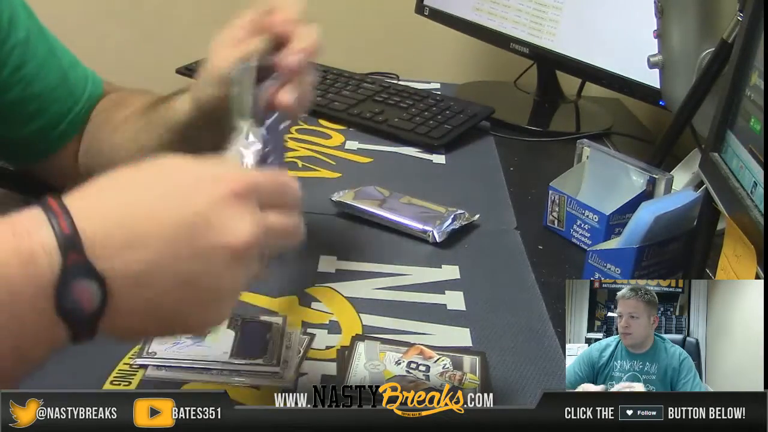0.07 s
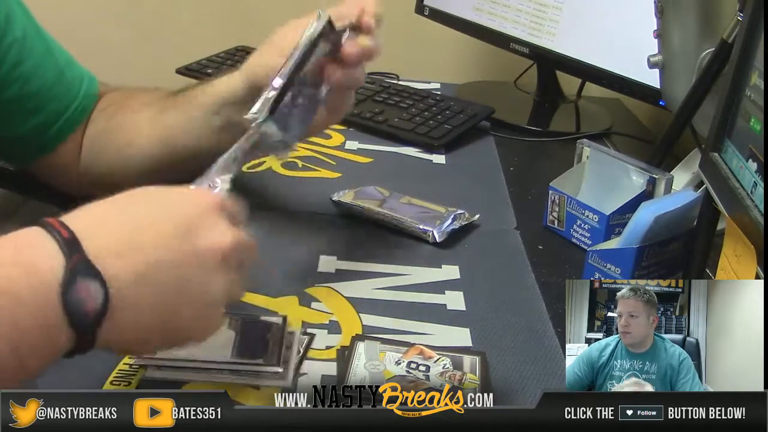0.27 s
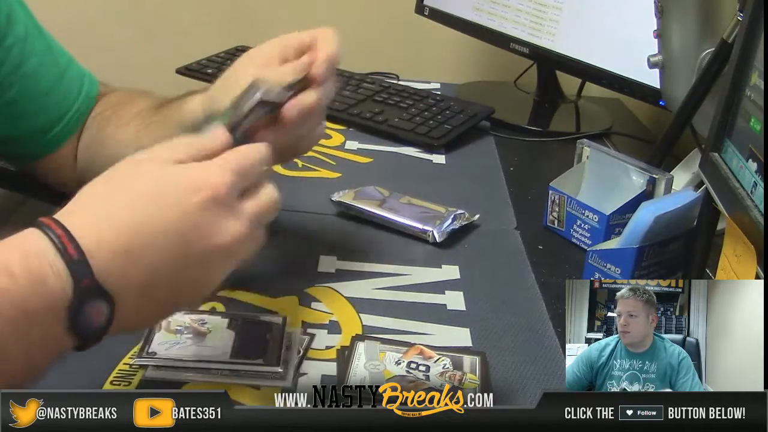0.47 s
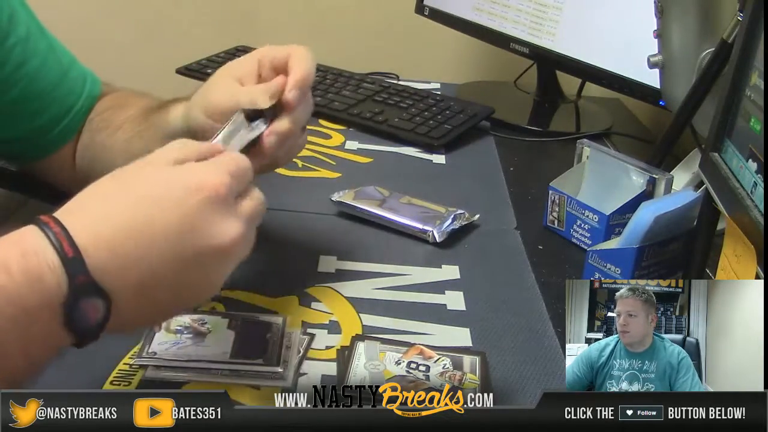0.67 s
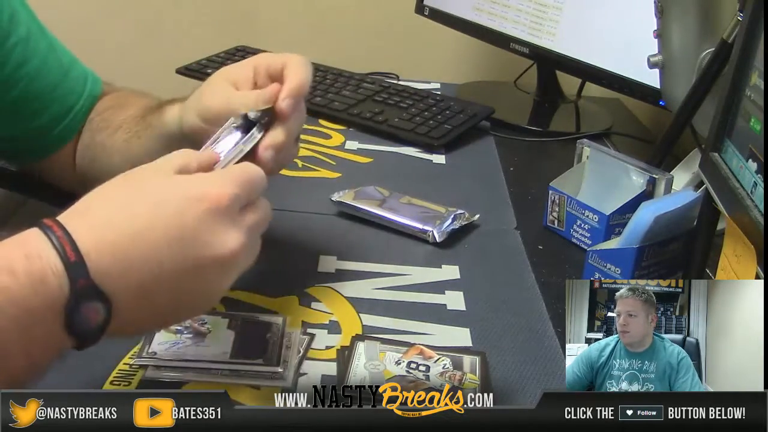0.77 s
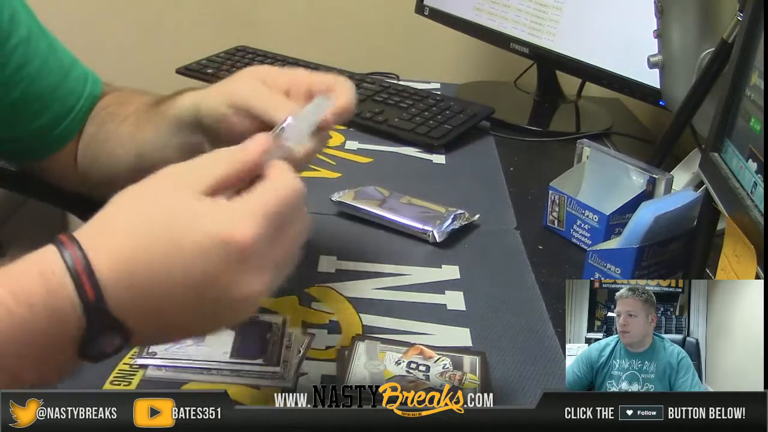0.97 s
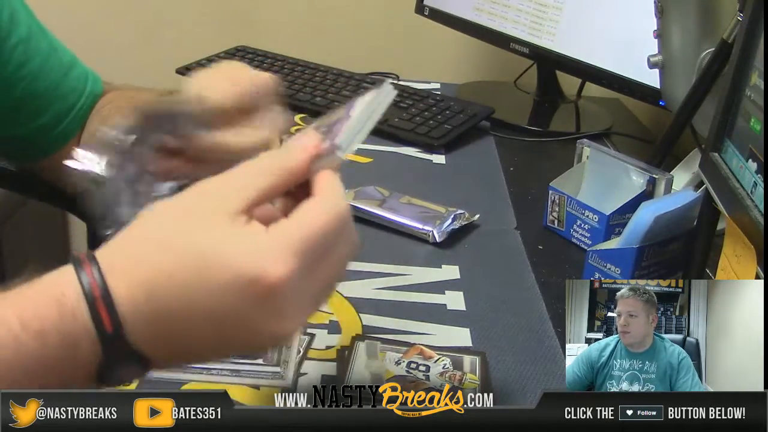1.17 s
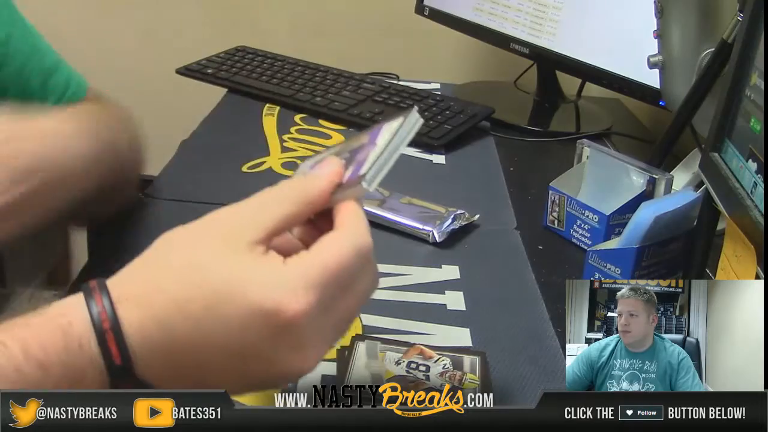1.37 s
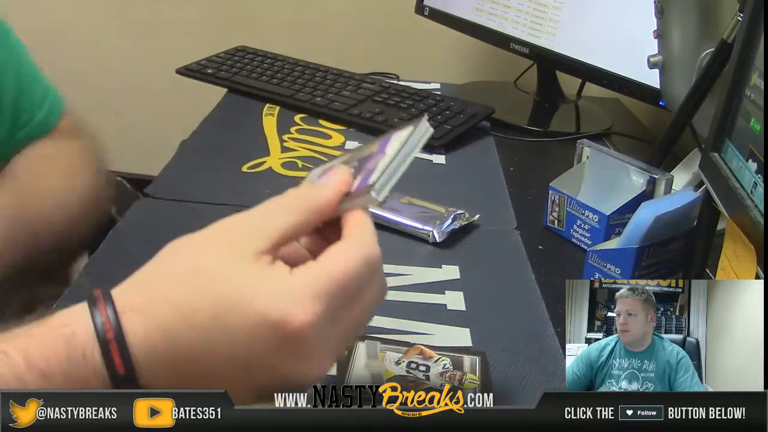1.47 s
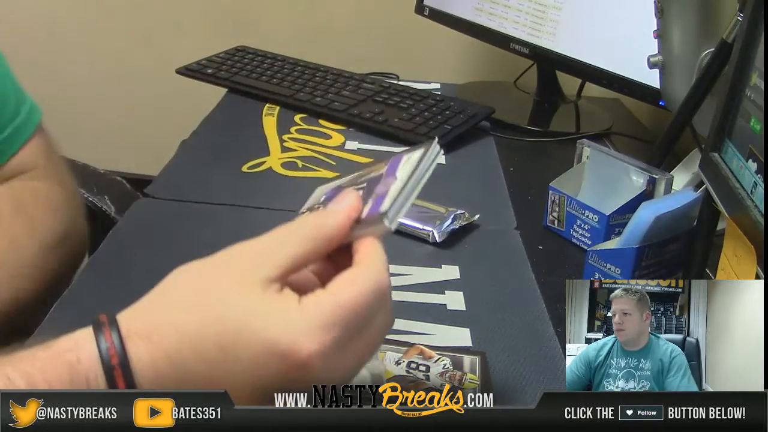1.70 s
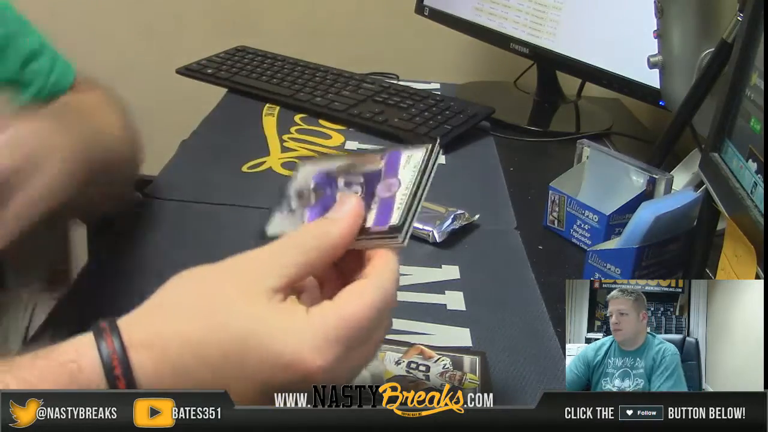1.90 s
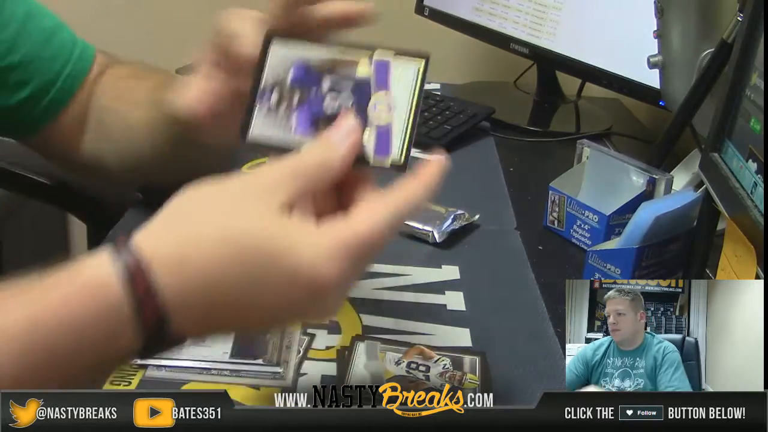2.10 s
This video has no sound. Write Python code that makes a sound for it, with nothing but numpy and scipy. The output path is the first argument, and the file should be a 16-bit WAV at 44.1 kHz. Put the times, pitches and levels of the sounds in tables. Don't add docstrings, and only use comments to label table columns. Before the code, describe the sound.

Crisp foil wrapper ripping with sharp snaps, then sparse crinkles, in a small humming room

```python
import sys
import numpy as np
from scipy import signal
from scipy.fft import rfft, irfft
from scipy.io import wavfile
from scipy.ndimage import uniform_filter1d

SR = 44100
rng = np.random.default_rng(int(sys.argv[2]) if len(sys.argv) > 2 else 0)


def linear_from_db(decibels):
    return 10 ** (np.asarray(decibels, float) / 20)


def pcm_store(signal):
    levels = np.round(np.clip(np.atleast_2d(signal), -1, 1) * 32767)
    wavfile.write(sys.argv[1], SR, levels.astype(np.int16).T)


N = 94506

# [t/s, peak level/dB,
# ring centre f/Hz, length/ms]
FOIL_SNAPS = [(0.0023, -1, 5230, 3.6), (0.0127, -13, 8100, 0.61), (0.0308, -7, 3400, 1.3),
              (0.0346, -11, 7400, 3.5), (0.0487, -13, 5730, 1), (0.0664, -14.8, 9700, 2.7),
              (0.0733, -13, 5560, 6.2), (0.0756, -13, 4430, 2), (0.0864, -14.5, 5000, 1.9),
              (0.0889, -18.5, 6400, 2.3), (0.0957, -21, 2280, 1.8), (0.1014, -3.5, 8600, 0.94),
              (0.1081, -10.5, 3770, 2.2), (0.1164, -15, 7020, 2), (0.1216, -19.5, 6300, 2),
              (0.129, -9.5, 3780, 1.4), (0.1429, -19, 1960, 1.8), (0.198, -23, 5040, 2.1),
              (0.2122, -30.5, 5270, 5.8), (0.2371, -22.5, 6060, 3.4), (0.248, -20, 6200, 2.7),
              (0.274, -29, 6230, 1.5), (0.3004, -28, 7600, 1.8), (0.3051, -21.5, 5100, 7.7),
              (0.3509, -25, 4600, 1.9), (0.3625, -17.5, 5170, 2.5), (0.3714, -13, 4500, 2.2),
              (0.3936, -34, 5500, 1.2), (0.4247, -28, 4860, 2.3), (0.4312, -23.5, 4500, 1.9),
              (0.4463, -24, 7060, 3.8), (0.4579, -20.5, 2710, 3.5), (0.4898, -27, 7100, 2.2),
              (0.5276, -28, 5860, 2.1), (0.5888, -41, 1650, 3), (0.6375, -28.5, 5330, 2.9),
              (0.6802, -30, 5800, 3.5), (0.8083, -36.7, 3160, 2.4), (0.8192, -33, 3280, 5.7),
              (0.8217, -28.5, 3340, 3), (0.8336, -26.6, 7700, 2.1), (0.8634, -15.6, 5560, 2.9),
              (0.9315, -25.5, 7700, 3.1), (0.9596, -26, 6600, 1.9), (0.9666, -27, 4550, 0.89),
              (0.9868, -22, 4850, 2), (0.9919, -19.5, 3270, 4.5),
              (1.0225, -18.5, 4730, 3.6), (1.0315, -22, 4600, 2.4), (1.0346, -20, 4520, 4.7),
               (1.0554, -35, 4450, 3.5), (1.0666, -14.5, 8200, 1.8), (1.0883, -16.5, 8150, 4.7),
               (1.0911, -22, 6550, 1.7), (1.1001, -24, 8100, 5.1), (1.121, -18, 2320, 7),
               (1.148, -21, 4310, 1.2), (1.1574, -11, 3600, 0.5), (1.1663, -22, 6000, 7),
               (1.18, -17, 7300, 2.5), (1.2237, -26.5, 3530, 2.6), (1.2822, -32, 3470, 4),
              (1.3085, -30, 1410, 7.2), (1.4029, -20, 7700, 1.5), (1.4418, -25.7, 2530, 3.1),
              (1.5055, -39, 5600, 1.9), (1.5168, -22.5, 2340, 4.3), (1.529, -27, 1300, 1.5),
              (1.5824, -27, 6100, 1.5), (1.5948, -25, 4800, 1.6), (1.669, -26, 8040, 3.1),
              (1.713, -22.5, 6200, 3.7), (1.7727, -28.5, 7400, 2), (1.785, -33, 1400, 1.8),
              (1.979, -48, 2720, 0.95), (2.0094, -35, 3000, 7.8)]
# [t/s, peak level/dB, ring centre f/Hz]
SMALL_TICKS = [(0.0576, -40, 4870), (0.1788, -29, 1760), (0.1881, -27, 6850), (0.2096, -26, 3900),
               (0.251, -19.5, 6350), (0.261, -34, 6030), (0.2684, -31, 5380), (0.3233, -30.5, 5640),
               (0.3339, -26.5, 2570), (0.3578, -28, 6630), (0.3647, -21.5, 6590), (0.411, -26.5, 7700),
               (0.4334, -24.5, 4180), (0.468, -45, 2600), (0.498, -34.1, 3620), (0.5207, -45, 5300),
               (0.535, -43, 8010), (0.5494, -48, 2630), (0.6104, -46.2, 2500), (0.6516, -44, 1130),
               (0.7075, -58, 3750), (0.7288, -36, 2310), (0.743, -42, 5160), (0.7652, -35, 5080),
               (0.7914, -41, 6370), (0.8374, -31, 3300), (0.8748, -35, 4740), (0.9, -52, 4300),
               (1.0273, -28, 4690), (1.1045, -22, 3560), (1.134, -31, 3530), (1.152, -37, 6890),
               (1.1876, -26, 6400), (1.2023, -23.5, 8180), (1.2057, -25, 5810), (1.219, -36, 3620),
               (1.2688, -38, 1420), (1.3042, -39, 2150), (1.3165, -43, 1550), (1.4323, -30.4, 3100),
               (1.4639, -46, 2720), (1.4958, -40, 2370), (1.539, -45, 6340), (1.6005, -36, 2150),
               (1.6577, -40, 2710), (1.662, -39, 5600), (1.691, -37, 2760), (1.6924, -29, 2780),
               (1.694, -34, 1570), (1.7213, -28, 5850), (1.746, -43, 4250), (1.7803, -44, 1440),
               (1.7993, -30, 1690), (1.8036, -36, 1740), (1.8101, -42, 2410), (1.9815, -37, 3060),
               (2.0253, -32.5, 3400), (2.0714, -48.5, 3100), (2.1357, -59, 3190), (2.1398, -45, 2830)]
# [start t/s, length/s, fine crackle level/dB, dullness 0-1]
FINGER_STROKES = [(-.01, 0.13, -27.5, 0.03), (0.168, 0.18, -43, 0.15), (0.36, 0.019, -38.5, 0),
                  (0.432, 0.037, -32.5, 0), (0.508, 0.031, -50.5, 0), (0.565, 0.029, -69, 0.3),
                  (0.627, 0.27, -50.5, 0.68), (0.799, 0.096, -49, 0), (0.949, 0.078, -43.5, 0.18),
                  (1.021, 0.2, -34, 0.41), (1.284, 0.1, -48, 0.22), (1.385, 0.089, -43, 0.3),
                  (1.5, 0.041, -41.5, 0.2), (1.576, 0.023, -42.5, 0.4), (1.667, 0.084, -37, 0.73),
                  (1.765, 0.059, -44, 0.61), (1.981, 0.074, -45, 0.9), (2.119, 0.041, -50, 0.8)]
# [f/Hz, level/dB]
FOIL_COLOUR = [(300, -6.5), (1000, -4), (2500, -4.5), (3700, -3), (8000, -2.5), (10000, -6), (16000, -4)]
# [t/s, peak level/dB, centre f/Hz]
SHEET_FLAPS = [(0.001, -25, 1470), (0.106, -32, 730), (0.455, -34.5, 383), (0.805, -42, 350),
               (0.96, -39, 422), (1.053, -34, 1370), (1.177, -27.5, 510), (1.085, -37, 523),
               (1.44, -38, 1710), (1.515, -46, 1420), (1.668, -38.5, 506), (1.709, -35, 1560),
               (0.76, -43, 433), (1.049, -39.5, 505), (1.268, -44.5, 483)]
# [t/s, peak level/dB, f/Hz, length/s]
FACET_SQUEAKS = [
    (1.306, -37, 1520, .012),
    (1.318, -43, 1650, .025),
    (1.684, -31, 2830, .017),
    (1.696, -33, 1550, .008),
    (1.977, -37, 2700, .01),
]
# [f/Hz, rms level/dB]
FAN_TONES = [
    (117.06, -46.3),
    (119.93, -49.5),
    (186.6, -57.5),
    (172.2, -63),
]
# [f/Hz, density level/dB per Hz]
AIR_COLOUR = [(24, -4), (38, 0), (55, -9.5), (150, -5.5), (230, -15), (700, -30), (2000, -39), (16000, -55)]
# [t/s, level/dB, f/Hz, t60/s]
DESK_KNOCKS = [
    (-.03, -14.5, 23, 0.13),
    (-0.39, -30, 31, 2.4),
    (-.02, -37, 175, 0.31),
    (1.287, -37, 40.2, 0.52),
    (1.279, -41, 154, 0.37),
]


def rms_one(x):
    return x / np.sqrt(np.mean(x ** 2) + 1e-20)


def colour_db(points, hz):
    table_hz, table_db = np.array(points).T
    return np.interp(np.log(hz), np.log(table_hz), table_db)


def drift(rate_hz):
    r = np.exp(-2 * np.pi * rate_hz * 40 / SR)
    settle = 2000
    white = rng.standard_normal(N // 40 + 2 + settle)
    slow = signal.lfilter([1], [1, -2 * r, r * r], white)[settle:]
    return np.interp(np.arange(N) / 40, np.arange(len(slow)), rms_one(slow - slow.mean()))


def ring(clicks, hz, t60_s):
    r = linear_from_db(-60 / (t60_s * SR))
    w = 2 * np.pi * hz / SR
    return signal.lfilter([0, np.sin(w)], [1, -2 * r * np.cos(w), r * r], clicks + 1e-18)


def snap_response(hz, centre_hz):
    above = 1j * hz / (centre_hz * 0.27)
    crack = (above / (1 + above)) ** 2 / (1 + 1j * hz / (centre_hz * 1.15)) ** 0.79
    sharpness = 8
    peak = linear_from_db(5.5) / (1 + 1j * sharpness * (hz / centre_hz - centre_hz / hz))
    return (crack + peak) * linear_from_db(colour_db(FOIL_COLOUR, hz))


def snaps():
    tail_db, tail_stretch, tick_ms = -6.5, 0.51, 2.2
    out = np.zeros(N + SR)
    t = np.arange(900) / SR
    hz = np.arange(1, 1026) * SR / 2048
    ticks = [(*tick, tick_ms) for tick in SMALL_TICKS]
    for s, db, centre_hz, ms in FOIL_SNAPS + ticks:
        clicks = linear_from_db(tail_db) * rng.laplace(size=900) * np.exp(-t * 1000 / (ms * tail_stretch))
        clicks[0] = 1
        spectrum = rfft(np.r_[np.zeros(60), clicks], 2048)
        spectrum = spectrum / np.sqrt(uniform_filter1d(np.abs(spectrum) ** 2, size=70))
        x = irfft(spectrum * snap_response(hz, centre_hz))[:1500]
        i = int(s * SR)
        out[i:i + len(x)] += linear_from_db(db) * x / np.abs(x).max()
    return out[66:N + 66]


def crackle():
    attack_s, release_s, sag_db = 0.019, 0.014, 6
    creases_per_s, clump_db, size_spread_db, ring_cycles = 7000, 3.0, 3, 7.8
    t = np.arange(N) / SR
    shapes = []
    for s, length, db, _ in FINGER_STROKES:
        rise = np.clip((t - s) / attack_s, 0, 1)
        fall = np.exp(-np.maximum(t - s - length, 0) / release_s)
        sag = sag_db * np.clip((t - s) / length, 0, 1) ** 2
        shapes.append(rise * fall * linear_from_db(db - sag))
    level = np.sum(shapes, axis=0) + 1e-9
    dull = np.dot(np.array(FINGER_STROKES)[:, 3], shapes) / level

    spread_db = size_spread_db * np.clip(1 - dull, .2, 1)
    sizes = linear_from_db(spread_db * np.minimum(rng.exponential(1, N), 4)) * rng.choice([-1, 1], N)
    born = rng.random(N) < creases_per_s * linear_from_db(clump_db * drift(60)) / SR
    home_band = rng.uniform(-2, 30, N)
    out = 0
    for k, hz in enumerate(np.geomspace(300, 17000, 28)):
        near = np.abs(home_band - k) < 3
        dull_db = 9.9 * dull * np.log2(np.maximum(hz, 3000) / 4000)
        gain = linear_from_db(colour_db(FOIL_COLOUR, hz) - dull_db) * hz / 4000
        out = out + gain * ring(sizes * born * near * (-1) ** k, hz, ring_cycles / hz)
    return level * rms_one(out)


def flaps():
    ring_cycles, spread_oct = 11, 1.064
    out = np.zeros(N + SR)
    t = np.arange(4000) / SR
    for s, db, centre_hz in SHEET_FLAPS:
        u, v = rng.uniform(-1, 1, (2, 6))
        mode_hz = centre_hz * 2 ** (spread_oct * (np.arange(6) - 2.5 + u / 2) / 4)
        gains = np.sign(v) * (1 - .5 * np.abs(u))
        x = 0
        for hz, gain in zip(mode_hz, gains):
            x = x + gain * np.sin(2 * np.pi * hz * t) * linear_from_db(-60 * t * hz / ring_cycles)
        x = x * (1 - np.exp(-t / .003))
        i = int(s * SR)
        out[i:i + len(t)] += linear_from_db(db) * x / np.abs(x).max()
    return out[:N]


def squeaks():
    out = 0
    t = np.arange(N) / SR
    for s, db, hz, length in FACET_SQUEAKS:
        rise = np.clip((t - s) / .002, 0, 1)
        fall = np.exp(-np.maximum(t - s - length / 2, 0) * 3 / length)
        x = ring(rng.standard_normal(N) * rise * fall, hz, t60_s=.012)
        out = out + linear_from_db(db) * x / np.abs(x).max()
    return out


def room(x):
    gap_s, t60_s, level_db, wall_cut_hz = 0.0038, .36, -12, 5700
    t = np.arange(SR // 2) / SR
    dense = rng.standard_normal(len(t)) * np.clip(t / gap_s - 1, 0, 1) * linear_from_db(-60 * t / t60_s)
    low = signal.sosfilt(signal.butter(1, wall_cut_hz, fs=SR, output="sos"), dense)
    tail = low + (dense - low) * np.exp(-t / 0.036)
    return linear_from_db(level_db) * signal.fftconvolve(x, tail / np.linalg.norm(tail))[:N]


def fans():
    t = np.arange(N) / SR - .136
    out = 0
    for hz, db in FAN_TONES:
        out = out + np.sqrt(2) * linear_from_db(db + .5 * drift(3)) * np.sin(2 * np.pi * hz * t)
    return out


def air():
    level_db, waver_db = -48, 1.5
    out = 0
    edges = 14 * 2 ** np.arange(0, 10.4, .5)
    white = rng.standard_normal((2, N + SR))
    for k, (low, high) in enumerate(zip(edges, edges[1:])):
        band_pass = signal.butter(2, [low, high], "band", fs=SR, output="sos")
        band = signal.sosfilt(band_pass, white[k % 2])[SR:]
        out = out + band * linear_from_db(colour_db(AIR_COLOUR, np.sqrt(low * high)) + waver_db * drift(2.7))
    return linear_from_db(level_db) * rms_one(out)


def desk():
    out = 0
    for s, db, hz, t60_s in DESK_KNOCKS:
        t = np.maximum(np.arange(N) / SR - s, 0)
        swell = linear_from_db(db - 60 * t / t60_s) * (1 - np.exp(-t / 0.023))
        out = out + 2 * swell * np.sin(2 * np.pi * hz * t)
    return out


def scene():
    foil = snaps() + flaps() + crackle()
    mix = foil + room(foil) + squeaks() + fans() + air() + desk()
    return mix[None]


def band_limit(x):
    return signal.sosfilt(signal.butter(12, 16980, fs=SR, output="sos"), x)


def record(dry):
    low_pass = signal.cheby2(20, 40, 16000, fs=SR, output="sos")
    cut = signal.sosfiltfilt(low_pass, dry)
    leak = linear_from_db(-42) * (dry - cut)
    return band_limit(cut + leak)


dry = scene()
out = record(dry)
pcm_store(out)
```